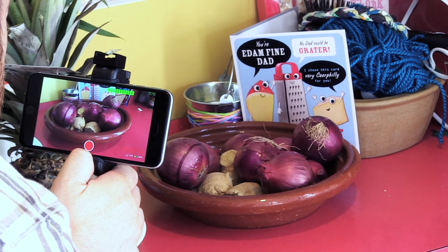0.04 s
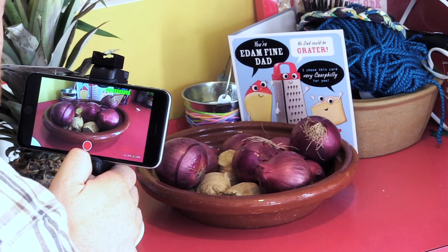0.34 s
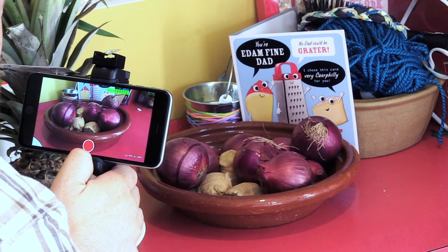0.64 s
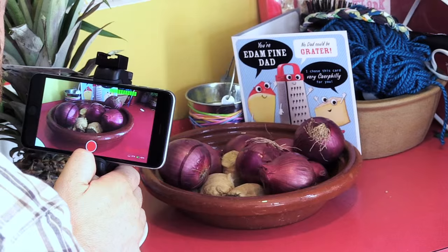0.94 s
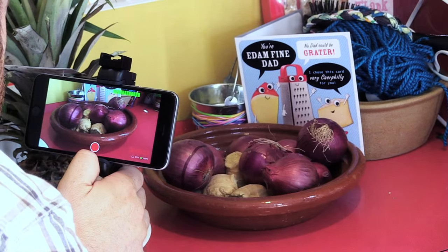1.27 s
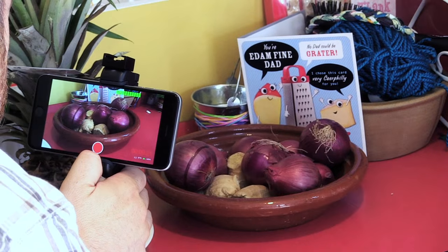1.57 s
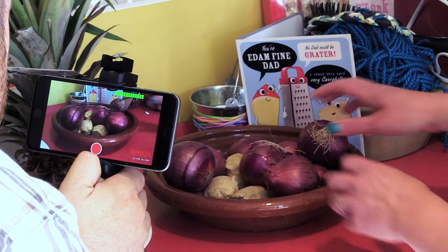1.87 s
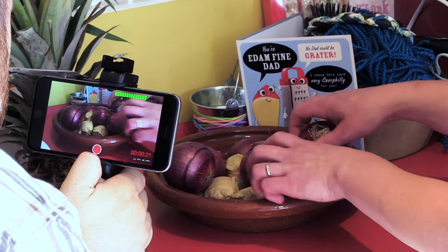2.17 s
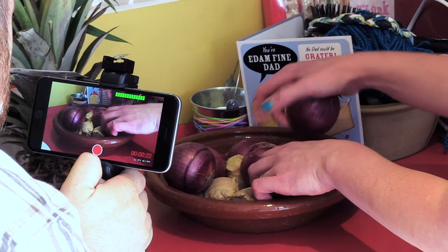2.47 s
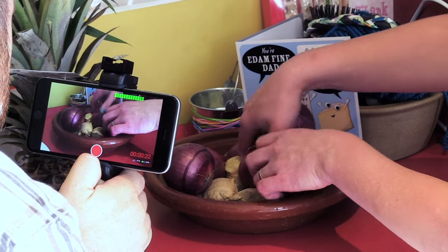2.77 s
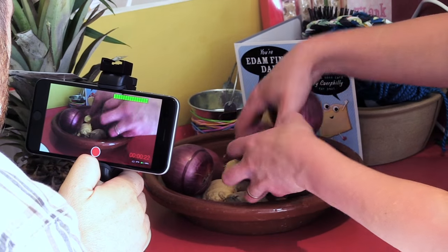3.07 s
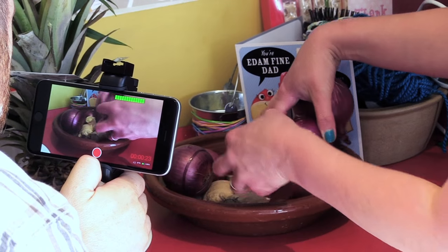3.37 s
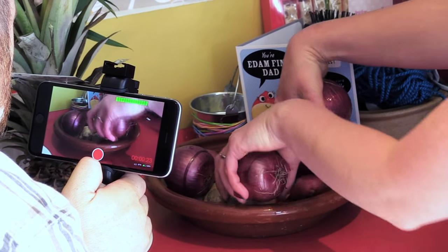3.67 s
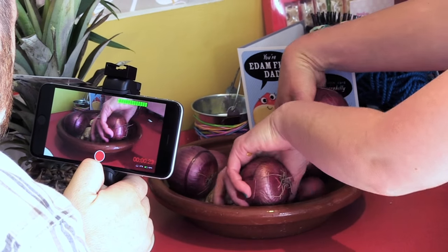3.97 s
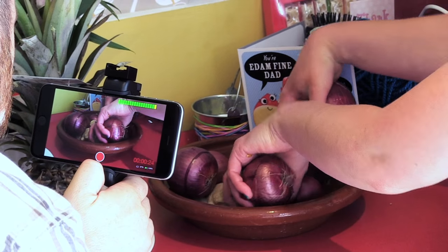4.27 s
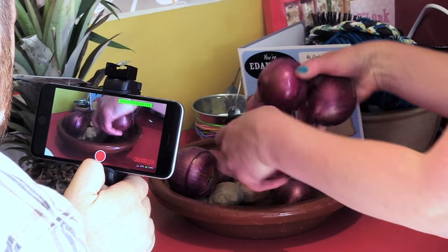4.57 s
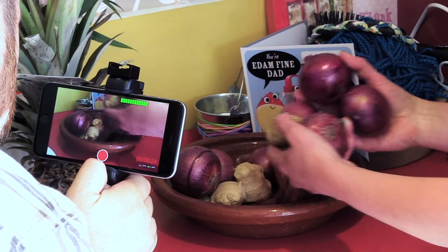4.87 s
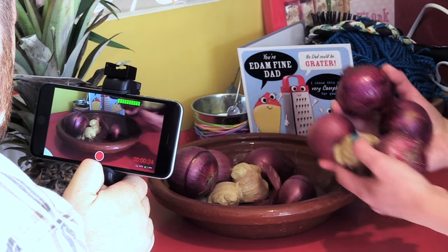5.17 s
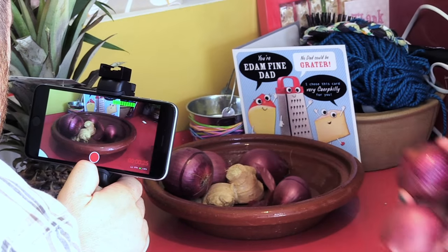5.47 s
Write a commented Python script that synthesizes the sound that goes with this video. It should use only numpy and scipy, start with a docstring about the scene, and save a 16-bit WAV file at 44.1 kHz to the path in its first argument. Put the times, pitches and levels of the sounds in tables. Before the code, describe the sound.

In a quiet kitchen, shoes scuff and thud on floorboards a little way off as someone steps up. Then, close to the microphone, onions are gathered from an earthenware bowl: dry skins rustle and snap in fits, and the bulbs rub and knock against the clay, once sharply. The handling thins out to a faint rustle over a low room hum.

```python
"""Dry onion skins rustle and snap as someone gathers the bulbs out of an earthenware bowl.
Each brittle fracture radiates a tick, and the many tiny ones merge into a crackle. Bulbs bump the
bowl, exciting its modes, and rub along its wall by stick-slip friction. Further off, shoes shuffle up
to the counter, thudding on the floorboards and scuffing over them. The kitchen reverberates,
and a low rumble and quiet room tone lie beneath."""
import sys
import numpy as np
from scipy import signal
from scipy.fft import rfft, irfft, next_fast_len
from scipy.io import wavfile
from scipy.ndimage import uniform_filter1d

SR = 44100
rng = np.random.default_rng(int(sys.argv[2]) if len(sys.argv) > 2 else 0)


def master(y):
    """Save y as 16-bit WAV."""
    cut = np.clip(np.atleast_2d(y).T, -1, 1)
    pcm = np.round(cut * 32767)  # scale
    wavfile.write(sys.argv[1], SR, pcm.astype(np.int16))


N = 252252
T = np.arange(N) / SR

# the sharpest cracks of the skins: start_s, strength_db, pitch_hz
SKIN_CRACKS = [(2.5007, -45, 10600), (2.5647, -40.5, 6800), (2.8719, -23, 10700), (2.9403, -33, 5100),
               (3.1202, -35, 9350), (3.2388, -35.5, 4740), (3.2828, -42, 7800), (3.3363, -34.5, 10500),
               (3.38, -30, 12800), (3.4483, -38.5, 3460), (3.472, -39.5, 10400), (3.6232, -37, 2750),
               (3.7213, -45, 2790), (3.8848, -36.5, 3100), (4.0361, -27.5, 6200), (4.193, -33.5, 10500),
               (4.234, -36, 11400), (4.2543, -25, 10600), (4.6566, -43, 8900), (4.7605, -42, 5560),
               (4.8663, -43, 8100)]
# the whisper of onions held between grips: start_s, length_s, skin_db, rub_db, palm_db
HOLD = [(2.198, 2.862, -74, -90, -92)]
# bulbs bumping the bowl: start_s, peak_db, corner_hz, ring_db, roll_s
BUMPS = [(2.221, -43, 405, 0, 0.016), (2.475, -48.5, 214, -1.5, 0.0082), (2.988, -38, 185, -0.5, 0.05),
         (3.361, -30, 201, -3.5, 0.076), (3.397, -23, 1590, -3.5, 0.032), (3.623, -40, 174, 5.5, 0.16),
         (3.849, -43.5, 121, -1, 0.019), (3.949, -38, 220, -1, 0.097), (4.1047, -17.5, 4000, -2.5, .06),
         (5.685, -43, 97.5, 6, 0.032)]


def rustle(skin_level, rub_level, palm_level, flutter_db=4.0, surge_db=1.85, tear_db=-6, palm_hz=1900):
    """Brittle fracture makes the skins crackle in fits; friction excites the cavities of bowl and hand."""
    # spectrum of the papery skins: frequency_hz, gain_db
    skin_spectrum = [(880, -49), (1500, -5), (1870, -5), (2040, -31), (2560, -14), (3730, -10), (11000, -2),
                     (15200, -11), (16000, -14.5)]
    # resonances of the hollow between bulbs, hand and bowl: centre_hz, width_hz, gain_db
    cavities = [(590, 130, 2.5), (1030, 500, 2), (1660, 200, -5.5), (2040, 63, 8.5), (2237, 140, 7.5),
                (2770, 190, 4), (3190, 110, 4.5), (3670, 290, -1.5)]
    fits = undb(flutter_db * walk(rate_hz=190) + surge_db * walk(rate_hz=54))
    tears = unit(crackle(per_s=3200, spread_db=6.0))
    skin = unit(fits * colour(flakes() + undb(tear_db) * tears, skin_spectrum))
    friction = fits * crackle(per_s=3500, spread_db=3.0)
    rub = sum(undb(db) * resonate(friction, hz, width) for hz, width, db in cavities if hz < palm_hz)
    palm = sum(undb(db) * resonate(friction, hz, width) for hz, width, db in cavities if hz >= palm_hz)
    return skin_level * skin + rub_level * unit(rub) + palm_level * unit(palm)


def flakes():
    """Size sets frequency: each size of flake crackles in its own band, two thirds of an octave apart."""
    out = 0
    for hz in 1200 * 2 ** (np.arange(7) * 2 / 3):
        fractures = crackle(per_s=2200, spread_db=5.0)
        out = out + shape(fractures, lambda f: np.sqrt(np.maximum(1 - 1.5 * np.abs(np.log2(f / hz)), 0)))
    return unit(out)


def grip_levels(rise_s=0.014, t60_s=0.22):
    """One force drives three sounds: each grip swells the skins, the rubbing and the cupped palm alike."""
    # fingers closing on an onion and pulling: start_s, length_s, skin_db, rub_db, palm_db
    grips = [(2.617, 0.14, -60, -63.5, -71.5), (2.854, 0.02, -51, -58.5, -63),
             (2.922, 0.094, -53.5, -60, -65), (3.054, 0.069, -56, -65.5, -74),
             (3.299, 0.099, -56.5, -67, -66), (3.398, 0.12, -65, -77, -72), (3.595, 0.039, -54, -61, -54.5),
             (3.65, 0.088, -62, -65, -75), (3.788, 0.099, -57.5, -61, -59), (4.038, 0.027, -56, -60, -58),
             (4.1, 0.1, -58.5, -72, -60), (4.231, 0.095, -57, -67, -67),
             (5.104, 0.049, -69.5, -63.5, -64.5)]
    return [envelope([(s, length, levels[k], t60_s) for s, length, *levels in grips + HOLD], rise_s)
            for k in range(3)]


def snaps(cracks, offset_db=-11.0, relative_width=0.63, tick_db=6, tear_db=-6, highpass_hz=1600):
    """Sudden release of strain: a flake starts to tear, breaks with a tick and briefly shivers."""
    out = np.zeros(N)
    lead = int(0.011 * SR)  # the tear swells for 11 ms before the break
    for s, db, hz in cracks:
        shiver = rng.standard_normal(SR // 2) * decay(T[:SR // 2], t60_s=0.014)
        shiver[0] += undb(tick_db)
        tear = undb(tear_db) * rng.standard_normal(SR // 20)[:lead] * np.exp(-T[:lead] / 0.0015)
        flake = resonate(np.concatenate([tear[::-1], shiver]), hz, hz * relative_width)
        flake = shape(flake, lambda f: 1 / (1 + highpass_hz / (1j * f)))
        break_rms = np.std(flake[lead:lead + SR // 400])
        add(out, s - lead / SR, flake * undb(db + offset_db) / break_rms)
    return out


def chance_cracks(skin_level, per_s=12, over_grip_db=13, spread_db=6, pitch_hz=7550, spread_oct=0.29):
    """Random fracture: small flakes break while the onions are held, louder under a firmer grip."""
    start, length = HOLD[0][:2]
    cracks = []
    for k, (late, size, pitch) in enumerate(rng.uniform(-1.1, 1, (int(length * per_s), 3))):
        s = start + (k + .5 + late) / per_s
        grip_db = 20 * np.log10(skin_level[min(int(s * SR), N - 1)] + 1e-9)
        cracks.append((s, grip_db + over_grip_db + spread_db * size, pitch_hz * 2 ** (spread_oct * pitch)))
    return cracks


def knocks(hard_crack_db=-28, sink_db=-37, sink_corner_hz=48, sink_ring_db=-30):
    """Impacts excite the bowl's modes: a bulb bumps it, or sinks against it when a skin cracks hard."""
    # modes of the loaded bowl on the counter: frequency_hz, gain_db, t60_s
    bowl_modes = [(78.76, -13, 0.47), (128, 0.5, 0.033), (181.4, -7.5, 0.26), (194, 2, 0.022),
                  (308, -16.5, 0.15), (407, -14, 0.21), (440, 7, 0.0083), (535, -2, 0.07),
                  (800, 2.5, 0.0083), (755, -10, 0.056), (965, -18.5, 0.055), (1590, -27, 0.05),
                  (2070, -27, .03), (3220, -25, 0.03), (3540, -19, 0.017)]
    # first reflections from the bowl's wall, the counter and the wall behind: delay_s, gain
    reflections = [(.0046, 0.069), (.0071, 0.056)]
    sinks = [(s, sink_db, sink_corner_hz, sink_ring_db) for s, db, _ in SKIN_CRACKS if db > hard_crack_db]
    direct = strike(bowl_modes, [bump[:4] for bump in BUMPS] + sinks)
    out = direct.copy()
    for delay, gain in reflections:
        add(out, delay, gain * direct)
    return out


def rolls(level_db=-59, t60_s=0.12, centre_hz=120, width_hz=140):
    """Rolling noise: after a bump the lumpy bulb tumbles on with a low, round rumble."""
    tumble = envelope([(s, length, level_db, t60_s) for s, *_, length in BUMPS], rise_s=0.0071)
    return tumble * noise_band(N, centre_hz, width_hz)


def drags():
    """Stick-slip friction: bulbs rasp against the clay."""
    # slips along the bowl's wall: start_s, level_db, length_s, pitch_hz
    bulb_slips = [(2.871, -43.5, 0.0046, 1110), (3.108, -51.5, 0.0052, 1340), (3.763, -55, 0.013, 2600),
                  (4.234, -52, 0.011, 1830), (4.253, -42, 0.0038, 1740), (4.425, -59.5, 0.031, 770)]
    return rasps(bulb_slips, relative_width=0.59)


def footfalls(contacts=4, gap_s=.016, fade_db=-5, softening=0.74):
    """Impacts excite the floor's modes: a heel lands, then the sole in ever weaker, softer contacts."""
    # heels landing: start_s, peak_db, corner_hz, ring_db
    heels = [(.905, -47.5, 1100, 2.5), (1.123, -52, 800, -2), (1.4827, -32, 2500, -2.5),
             (1.517, -37.5, 900, 19), (1.610, -35.5, 800, -1), (1.966, -24.5, 405, -2)]
    # modes of the floorboards: frequency_hz, gain_db, t60_s
    floor_modes = [(96, 0.5, 0.11), (152.6, -10, 0.4), (183.1, -4.5, 0.17), (220, -2.5, 0.18),
                   (274, -9, 0.22), (336, -3, 0.091), (472, -2, 0.084), (519, -1, 0.1), (591, 0.5, 0.062),
                   (694, 5.5, 0.06), (797, 8.5, 0.019), (950, -1, 0.062), (1102, 2, 0.018),
                   (1380, -1, 0.024), (1640, -2, 0.043)]
    blows = [(s + k * gap_s, db + k * fade_db, hz * softening ** k, ring_db)
             for s, db, hz, ring_db in heels for k in range(contacts)]
    return strike(floor_modes, blows)


def scuffs(rise_s=0.0068, base_t60_s=0.13, t60_per_s=4):
    """Sliding friction: the soles hiss and grind, and a longer slide takes longer to die away."""
    # soles sliding: start_s, length_s, hiss_db, grind_db
    slides = [(0, 0.097, -65, -66), (.36, 0.048, -71, -78), (.85, 0.026, -65.5, -80),
              (0.878, 0.033, -59, -60.5), (0.987, .006, -66, -64), (1.201, 0.013, -60.5, -63),
              (1.24, .02, -69, -66), (1.39, 0.014, -67, -78), (1.482, 0.017, -51, -54),
              (1.503, 0.051, -49, -55), (1.767, 0.05, -63, -68), (1.956, 0.053, -51.5, -56.5),
              (2.323, 0.018, -55, -78), (5.631, .1, -69, -75)]
    # spectrum of the gritty hiss: frequency_hz, gain_db
    hiss_spectrum = [(710, -52), (1200, -3.5), (1680, 0), (2090, -2.5), (4450, 8), (6030, 5.5), (8820, 8.5),
                     (12100, 4.5), (16000, -1)]
    hiss = unit(colour(crackle(per_s=11000, spread_db=3), hiss_spectrum))
    grind = unit(resonate(crackle(per_s=3700, spread_db=4.5), hz=700, width_hz=500))
    out = 0
    for k, texture in enumerate([hiss, grind]):
        swells = [(s, length, levels[k], base_t60_s + t60_per_s * length) for s, length, *levels in slides]
        out = out + texture * envelope(swells, rise_s)
    return out


def sole_slips():
    """Stick-slip friction: grit scrapes in a broad band, a turning sole squeaks in a narrow one."""
    # grit under the soles: start_s, level_db, length_s, pitch_hz
    grit = [(.880, -53, 0.0058, 2330), (.992, -60.5, .012, 4670), (1.242, -52, .006, 3500)]
    # a sole turning: start_s, level_db, length_s, pitch_hz
    squeak = [(.04, -66, 0.16, 1140)]
    return rasps(grit, relative_width=0.8) + rasps(squeak, relative_width=0.14)


def kitchen(x, gap_s=0.0039, build_s=0.0015):
    """Reverberation: diffuse reflections from walls and cupboards, each octave dying at its own rate."""
    # reverberation times: frequency_hz, t60_s
    decay_times = [(100, 0.56), (500, 0.32), (2000, 0.5), (8000, 0.36), (16000, 0.36)]
    t = T[:SR // 2]
    noise, tail = rng.standard_normal(len(t)), 0
    for hz in 2. ** np.arange(5, 15):
        band = shape(noise, lambda f: np.maximum(1 - np.abs(np.log2(f / hz)), 0))
        tail = tail + band * decay(t, at(decay_times, hz))
    tail = tail * np.clip((t - gap_s) / build_s, 0, 1)
    return signal.fftconvolve(x, tail / np.linalg.norm(tail))[:N]


def room_tone(level_db=-59.5, waver_db=.5):
    """The noise floor: nearly steady broadband noise, strongest in the bass."""
    # spectrum of the quiet room: frequency_hz, gain_db
    room_spectrum = [(15, -27), (25, 0.5), (59, -3.5), (180, -7.5), (270, -13.5), (384, -13), (427, -17.5),
                     (503, -17.5), (754, -22), (911, -21.5), (1700, -29.5), (9840, -36.5), (14800, -39),
                     (16000, -47)]
    noise = unit(colour(rng.standard_normal(N), room_spectrum))
    return noise * undb(level_db + waver_db * walk(rate_hz=3.73))


def rumble(pitch_hz=42, wander_hz=2.5, waver_db=2.6, octave_db=-18):
    """Random modulation: a low drone in the building, with a weak octave, wavers in pitch and level."""
    # course of the drone: time_s, level_db
    drone_levels = [(0, -55), (.35, -57.5), (.85, -47), (1.1, -49.5), (1.8, -51), (2.3, -58.5), (2.6, -54),
                    (3.2, -54.5), (4.2, -64), (4.5, -105), (5.7, -73)]
    phase = 2 * np.pi * np.cumsum(pitch_hz + wander_hz * walk(rate_hz=13)) / SR
    drone = np.sqrt(2) * (np.sin(phase) + undb(octave_db) * np.sin(2 * phase))
    return drone * undb(waver_db * walk(rate_hz=23) + np.interp(T, *np.transpose(drone_levels)))


def strike(modes, blows, detune=0.013, lingering_s=0.083):
    """Modal superposition: each blow starts damped cosines; ring_db weights the lingering ones."""
    out, t = np.zeros(N), T[:SR // 2]
    for s, db, corner_hz, ring_db in blows:
        ring = 0
        for k, (hz, mode_db, t60) in enumerate(modes):
            swing = np.cos(2 * np.pi * hz * (1 + detune * rng.standard_normal()) * t) * decay(t, t60)
            # neighbouring modes radiate with opposite signs
            ring = ring + (-1) ** k * undb(mode_db + ring_db * (t60 > lingering_s)) * swing
        # a soft contact passes little above its corner frequency
        blow = signal.sosfilt(signal.butter(3, corner_hz, fs=SR, output="sos"), ring)
        add(out, s, blow * undb(db) / np.abs(blow).max())
    return out


def rasps(slips, relative_width):
    """Friction noise follows the pressure, which peaks about halfway through a slip and then lets go."""
    out = np.zeros(N)
    for s, db, length, hz in slips:
        rasp = noise_band(SR // 8, hz, hz * relative_width)
        age = T[:len(rasp)] / length
        pressure = 2 * age * np.exp(1 - 2 * age - (age / 2) ** 2)
        add(out, s, rasp * undb(db) * pressure)
    return out


def envelope(swells, rise_s):
    """Incoherent sounds add by power: the joint amplitude of swells that rise, hold and die away."""
    power = np.zeros(N)
    for s, length, db, t60 in swells:
        t = T[:int((length + t60) * SR)]
        swell = undb(db) * np.minimum(t / rise_s, 1) * decay(np.maximum(t - length, 0), t60)
        add(power, s, swell ** 2)
    return np.sqrt(power)


def crackle(per_s, spread_db):
    """A Poisson train of tiny fractures, most weak and a few strong."""
    size = undb(spread_db * np.minimum(rng.exponential(size=N), 4))
    return (rng.random(N) < per_s / SR) * size * rng.choice([-1, 1], N)


def noise_band(samples, hz, width_hz):
    """Noise of unit rms through two resonances, the second twice as wide."""
    return unit(resonate(resonate(rng.standard_normal(samples), hz, width_hz), hz, 2 * width_hz))


def walk(rate_hz):
    """Smooth random wander of unit rms."""
    k = int(SR / rate_hz)
    return unit(uniform_filter1d(np.repeat(rng.standard_normal(N // k + 1), k), k)[:N])


def resonate(x, hz, width_hz):
    """A second-order resonance, gain one at its centre."""
    return shape(x, lambda f: 1 / (1 + 1j * (f * f - hz * hz) / (f * width_hz)))


def colour(x, points):
    """Filter by a curve of (frequency_hz, gain_db) points."""
    return shape(x, lambda f: undb(at(points, f)))


def shape(x, gain):
    """Filter by a gain that is a function of frequency."""
    size = next_fast_len(len(x) + 4096)
    hz = np.maximum(np.fft.rfftfreq(size, 1 / SR), 1)
    return irfft(rfft(x, size) * gain(hz), size)[:len(x)]


def at(points, f):
    """Read (frequency_hz, value) points on a logarithmic frequency axis."""
    hz, value = np.transpose(points)
    return np.interp(np.log(f), np.log(hz), value)


def decay(t, t60_s):
    """Exponential damping, 60 dB in t60_s."""
    return np.exp(-np.log(1000) * t / t60_s)


def undb(db):
    """Decibels to gain."""
    return 10 ** (np.asarray(db) / 20)


def unit(x):
    """Scale to an rms of one."""
    return x / np.sqrt(np.mean(x ** 2))


def add(out, s, x):
    """Mix x into out from time s."""
    i = int(s * SR)
    out[i:i + len(x)] += x[:max(N - i, 0)]


def scene(bowl_wet_db=-10, skin_wet_db=-8, feet_wet_db=-6):
    """The direct-to-reverberant ratio conveys distance: the bowl is close, the feet further off."""
    skin_level, rub_level, palm_level = grip_levels()
    bowl = knocks() + rolls()
    feet = scuffs() + footfalls() + sole_slips()
    skins = rustle(skin_level, rub_level, palm_level) + drags()
    skins += snaps(list(SKIN_CRACKS) + chance_cracks(skin_level))
    room = kitchen(bowl * undb(bowl_wet_db) + skins * undb(skin_wet_db) + feet * undb(feet_wet_db))
    return (skins + bowl + feet + room + room_tone() + rumble())[None]


def record(dry, top_hz=15900):
    """Band limiting: the microphone chain cuts the highest treble steeply."""
    return signal.sosfilt(signal.ellip(10, .2, 70, top_hz, fs=SR, output="sos"), dry)


dry = scene()
out = record(dry)
master(out)
```